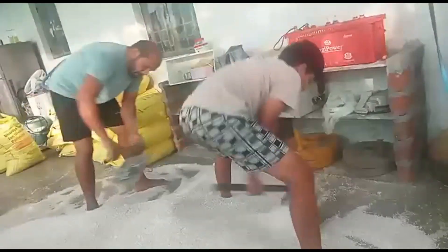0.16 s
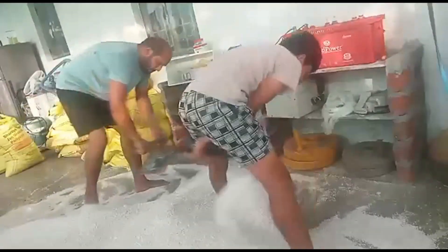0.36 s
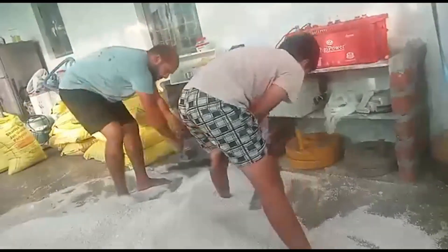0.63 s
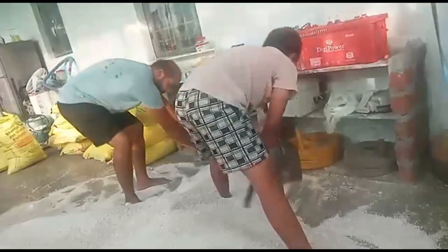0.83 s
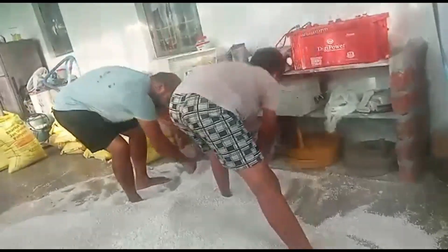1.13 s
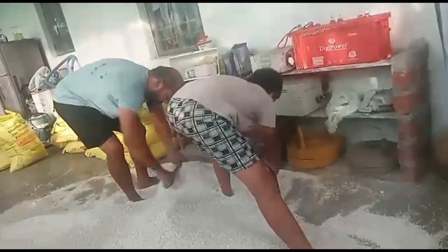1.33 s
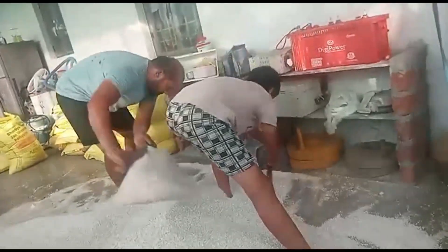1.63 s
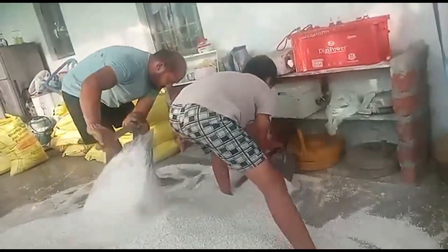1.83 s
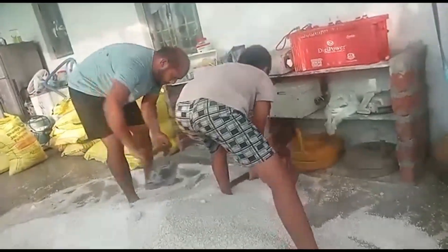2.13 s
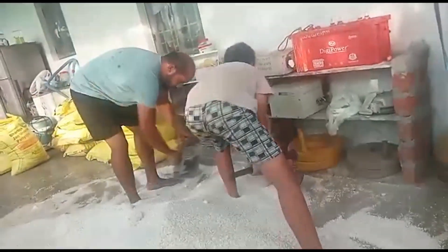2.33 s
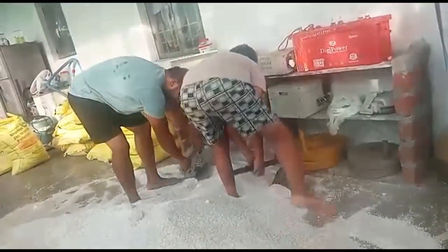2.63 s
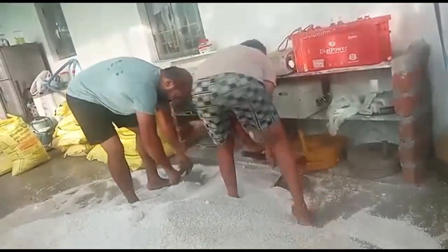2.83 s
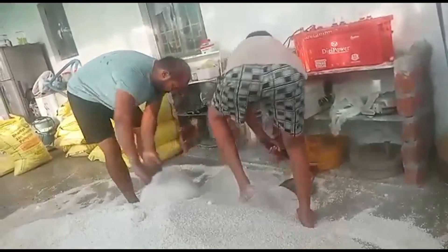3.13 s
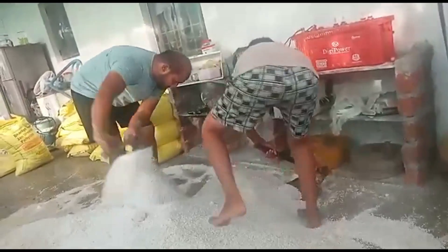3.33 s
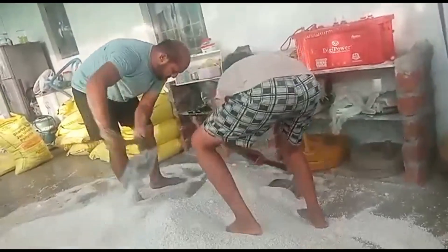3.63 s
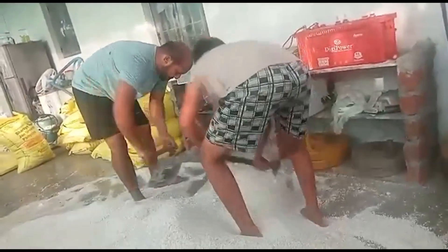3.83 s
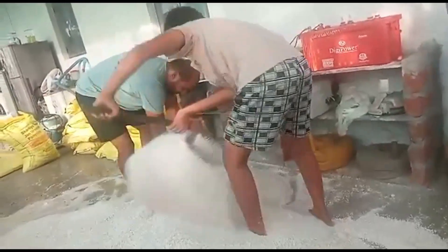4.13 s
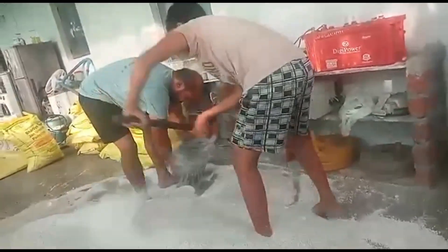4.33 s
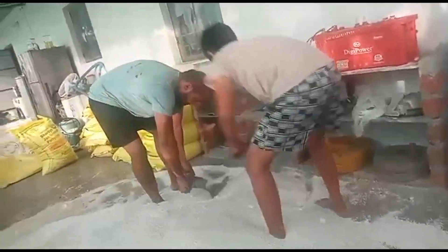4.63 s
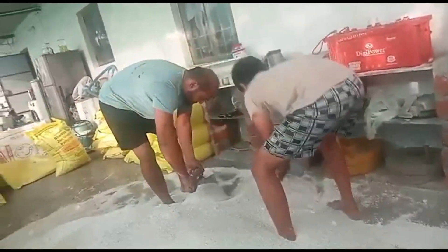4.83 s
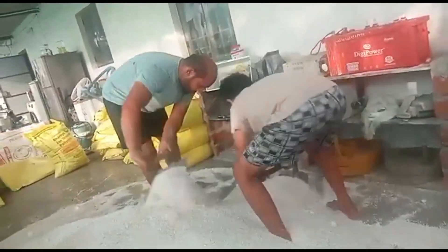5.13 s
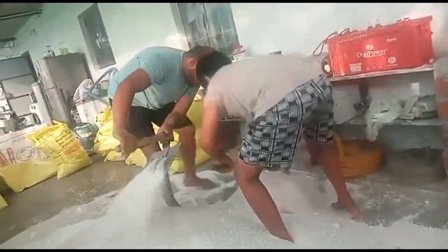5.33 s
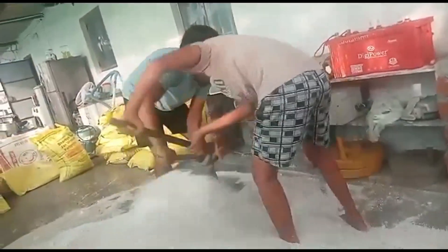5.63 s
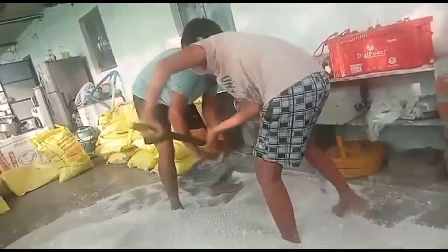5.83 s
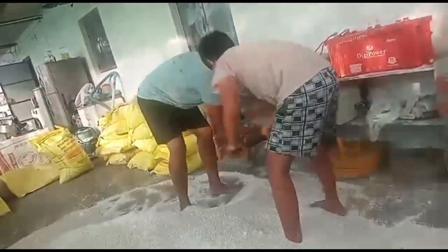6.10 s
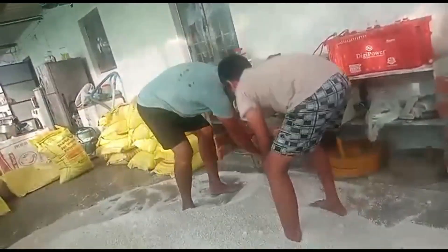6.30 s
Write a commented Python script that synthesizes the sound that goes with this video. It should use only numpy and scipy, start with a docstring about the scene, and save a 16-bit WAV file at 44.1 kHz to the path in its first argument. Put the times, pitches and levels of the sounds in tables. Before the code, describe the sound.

In a hard-walled store room, two steel shovels work dry granular fertilizer on concrete, heard close in mono over faint room tone. A soft scrape fades by 0.2 s while granules trickle. At 0.65-1.0 s comes the loudest passage: a rapid run of bright, crunchy clanks with ringing scrape and low blade thumps. It drops to quiet trickling; faint gliding bird chirps sound at 1.25-1.7 s. From 1.85 s a scrape swells into a clank near 1.95, then a heavy ringing hit with a thump at 2.24 and another at 2.35, trailing into lighter scrapes until 3.05. A duller clatter and scrape follows at 3.5-3.65, a short sharp clank at 4.03, a scrape at 4.4-4.7, faint chirps near 5.0, and a gritty push at 5.13-5.45. A bright crunching strike at 5.85 leads to scraping, thumps and high thin clinks, strongest around 6.26-6.3, ending in faint hiss.

```python
"""Two shovels in granular fertilizer

In a store room, two steel hand shovels work a heap of fertilizer on a concrete floor.
The blades scrape and strike the floor: noise bursts for grit, damped modes for the ringing steel,
low modes for the loaded blade. Thrown or trickling granules hiss as dense, lumpy noise.
A loose steel fitting clinks in decaying sines; a bird outside chirps in short gliding whistles.
One phone microphone takes it all in, with room tone and an answer from the walls."""
import sys
import numpy as np
from scipy import signal
from scipy.fft import rfft, irfft, next_fast_len
from scipy.io import wavfile
from scipy.ndimage import uniform_filter1d, map_coordinates

SR = 44100
rng = np.random.default_rng(int(sys.argv[2]) if len(sys.argv) > 2 else 0)


def generate_wav(sig):
    """Save sig (samples, or channels by samples) to the path in sys.argv[1] as 16-bit PCM at SR."""
    pcm = np.round(np.clip(np.atleast_2d(sig).T, -1, 1) * 32767).astype(np.int16)
    wavfile.write(sys.argv[1], SR, pcm)


N = 284886
T = np.arange(N) / SR  # s
T_HIT = T[:SR // 2]  # the half second given to each blow, push or clink


def amp(db):
    """Gain of a level in dB."""
    return 10 ** (np.asarray(db) / 20)


def unit(x):
    """The signal scaled to rms 1."""
    return x / np.sqrt(np.mean(x ** 2) + 1e-20)


def along(points, hz):
    """Values between (Hz, value) points, read on a log frequency axis."""
    f, v = np.transpose(points)
    return np.interp(np.log(hz + 1), np.log(f + 1), v)


def wobble(rate):
    """A smooth random curve over the whole scene, with rate knots a second."""
    return map_coordinates(rng.standard_normal(int(N * rate / SR) + 4), [T * rate])


def jitter(rate):
    """A smooth random curve half a second long, with rate knots a second."""
    return map_coordinates(rng.standard_normal(int(rate) + 4), [T_HIT * rate])


def filtered(x, response):
    """The signal passed through a complex response of frequency."""
    m = next_fast_len(len(x) + 8192)
    spectrum = rfft(x, m) * response(np.fft.rfftfreq(m, 1 / SR))
    return irfft(spectrum, m)[:len(x)]


def mode(f, hz, width):
    """Response of one damped resonance: the wider it is, the sooner it dies."""
    return 1j * f * width / (hz * hz - f * f + 1j * f * width)


def grains(spectrum, spiky_db, lumpy_db, streaky_db):
    """Dense tiny impacts of uneven size that come in lumps; countless weak modes streak them."""
    lumps_db = lumpy_db * (wobble(70) + 0.57 * wobble(25))
    sizes = amp(spiky_db * rng.standard_normal(N) + lumps_db)
    z = signal.stft(sizes * rng.standard_normal(N), nperseg=1024)[2]
    streaks = uniform_filter1d(rng.standard_normal(z.shape), size=4, axis=1)
    impacts = signal.istft(z * amp(streaky_db * unit(streaks)), nperseg=1024)[1][:N]
    return unit(filtered(impacts, lambda f: amp(along(spectrum, f))))


def ringing(modes, drift_db, lumpy_db):
    """Jolts of friction drive all modes; the contact wanders, so each one also swells on its own."""
    jolts = amp(lumpy_db * wobble(50))
    ring = np.zeros(N)
    for hz, width, db in modes:
        swell = amp(db + drift_db * np.tanh(wobble(20)))
        drive = jolts * swell * rng.standard_normal(N)
        # the resonance acts twice, so each is widened; the root keeps wide modes from gaining power
        ring += filtered(drive, lambda f: mode(f, hz, 1.64 * width) ** 2 / np.sqrt(width))
    ring = unit(ring)
    # the stroke's power is shared: when one mode swells the others give way
    nearby_power = np.abs(uniform_filter1d(ring ** 2, size=3000))
    return unit(ring / (nearby_power + .1) ** 0.37)


def favoured(modes, hz, db_per_octave, wander):
    """Unsteady swings: the load detunes the modes until the nearest lies at hz; neighbours are fainter."""
    pitch = np.array([m[0] for m in modes], float)
    nearest = np.argmin(abs(np.log(pitch / hz)))
    pitch = pitch * hz / pitch[nearest]
    db = -db_per_octave * abs(np.log2(pitch / hz))
    loudest = np.argsort(-db)[:3]
    return sum(amp(db[k]) * np.sin(2 * np.pi * pitch[k] * T_HIT + wander()) for k in loudest)


# tone of the store room at the microphone: pitch_hz, density_db (per Hz, relative)
ROOM_TONE = [(25, -26), (40, -13), (57, -0.5), (95, 2), (125, -10), (180, -3), (330, -8.5), (420, -9),
             (700, -15), (1900, -15), (3600, -15), (5700, -38), (10300, -12.5), (15600, -23.5)]
ROOM_TONE_DB = -62  # rms


def room_tone():
    """The steady air of the store room: a bed of nearly even noise."""
    return amp(ROOM_TONE_DB) * grains(ROOM_TONE, spiky_db=1.5, lumpy_db=1.0, streaky_db=1.0)


# how long the store room rings: pitch_hz, t60_s
WALLS = [(200, 0.43), (2000, 0.23), (10000, 0.096)]


def walls(x):
    """Each frequency of the room's answer dies at its own speed."""
    hz, t, z = signal.stft(rng.standard_normal(SR // 2), SR, nperseg=256)
    decay = amp(-60 * t / along(WALLS, hz)[:, None])
    tail = signal.istft(z * decay, SR, nperseg=256)[1]
    late = np.pad(x, (300, 0))  # samples of delay before the answer
    return signal.fftconvolve(late, tail / np.linalg.norm(tail))[:N]


# chirps from outside: start_s, length_s, start_pitch_hz, end_pitch_hz, level_db
CHIRPS = [(1.262, .05, 3400, 3730, -58), (1.287, 0.054, 4250, 4350, -57), (1.301, 0.073, 3230, 3080, -61),
          (1.465, .07, 3150, 3400, -54), (1.511, 0.065, 2900, 3030, -51), (1.565, .04, 3400, 3700, -60),
          (1.608, 0.04, 3430, 3400, -52), (1.622, 0.055, 3200, 3150, -53), (4.97, 0.06, 3610, 3530, -59),
          (5.0, 0.038, 4550, 4560, -62)]


def bird():
    """Short gliding whistles, made slightly rough by a fast random pitch."""
    out = np.zeros(N)
    for start, length, hz0, hz1, db in CHIRPS:
        n = round(length * SR)
        pitch = np.linspace(hz0, hz1, n) + 110 * wobble(162)[:n]
        whistle = np.sin(2 * np.pi * np.cumsum(pitch) / SR)
        out[round(start * SR):][:n] += amp(db) * np.sqrt(np.hanning(n)) * whistle
    return out


# light contacts of the loose fitting: start_s, level_db, low_modes_db (added below 7 kHz)
CLINKS = [(5.95, -51, -20), (6.12, -48.5, -15), (6.261, -37.5, -12), (6.283, -39, 0), (6.305, -46.5, 1),
          (6.394, -43, -10)]
# modes of the fitting: pitch_hz, level_db, t60_s
FITTING = [(2196, -16.5, .8), (2821, -5, 0.14), (4502, -10, .42), (5630, -13, 0.45), (5900, -19, 0.83),
           (8436, -8, 0.22), (9240, -10, 0.29), (10340, 2.5, 0.24), (11600, -18, .2), (13500, -25, .2)]


def fitting():
    """Light contacts ring a loose steel part; where it is touched sets the share of its low modes."""
    out = np.zeros(N + SR)
    for start, db, low_db in CLINKS:
        ring = np.zeros(len(T_HIT))
        for hz, mode_db, t60 in FITTING:
            touch_db = low_db * (hz < 7000) + rng.uniform(-2.7, 1.3)
            unsteady_db = 1.5 * wobble(34)[:len(T_HIT)]
            level = amp(mode_db + touch_db - 60 * T_HIT / t60 + unsteady_db)
            ring += level * np.sin(2 * np.pi * (hz * T_HIT + rng.random()))
        onset = 1 - np.exp(-T_HIT / 0.0075)
        out[round(start * SR):][:len(T_HIT)] += amp(db) * ring * onset
    return out[:N]


# soft pushes on the loaded blade: start_s, level_db, pitch_hz (loudest ring)
THUMPS = [(.05, -52, 450), (.13, -52, 460), (0.66, -32, 167), (.658, -37, 470), (.708, -40, 470),
          (.715, -40, 180), (.745, -35, 449), (.79, -38, 480), (.845, -43, 460), (.88, -43, 450),
          (1.55, -52, 823), (1.959, -48, 203), (2.11, -50, 340), (2.236, -27, 489), (2.24, -32, 272),
          (2.27, -34, 520), (2.25, -39, 149), (2.25, -38, 900), (2.45, -46, 150), (2.36, -40, 142),
          (2.58, -44, 180), (2.685, -43, 453), (2.99, -44, 449), (3.04, -46, 520), (3.5, -33, 449),
          (3.5, -38, 820), (3.505, -47, 171), (3.63, -42, 450), (3.525, -35.5, 474), (4.44, -46, 960),
          (4.5, -45, 960), (5.09, -54, 1050), (5.14, -48, 1006), (5.24, -40.5, 441), (5.3, -45, 820),
          (5.852, -33, 180), (5.924, -35, 356), (5.925, -42, 830), (5.955, -33, 819), (5.99, -35, 810),
          (5.96, -36, 241), (6.04, -46, 450), (6.13, -46, 480), (6.238, -42, 270), (6.3, -48, 350)]
# low modes of a loaded blade: pitch_hz, width_hz, level_db
BELLY = [(146, 28, -16), (177.8, 83, -5), (256, 140, -16), (359.5, 63, -5), (450.8, 64, 3.5), (537, 136, 0),
         (812, 53, -3), (951, 78, -2.5)]
THUMP_T60_S, THUMP_FAVOUR_DB_PER_OCTAVE = .25, 35


def thumps():
    """A soft push sets the low modes swinging, unsteady in phase and strength."""
    out = np.zeros(N + SR)
    for start, db, hz in THUMPS:
        swing = favoured(BELLY, hz, THUMP_FAVOUR_DB_PER_OCTAVE, lambda: 1.09 * jitter(60.6))
        strength = amp(2.8 * np.tanh(jitter(43)))
        shape = amp(db - 60 * T_HIT / THUMP_T60_S) * (1 - np.exp(-T_HIT / 0.006))
        out[round(start * SR):][:len(T_HIT)] += shape * strength * swing
    return out[:N]


# blows of a blade: start_s, level_db, t60_s (of the crunch), brightness_db (per octave, of the crack),
# pitch_hz (loudest ring), shovel (0 first, 1 second)
BLOWS = [(0.291, -31, .07, -2, 2163, 1), (0.656, -6, .09, 5, 3580, 0), (0.707, -7.5, .08, -.4, 1830, 0),
         (0.794, -17.5, .12, 8, 950, 0), (.8, -20, .12, -3, 1700, 0), (0.859, -7, .15, 3, 2300, 0),
         (0.889, -6, .1, 4, 2980, 0), (0.938, -6, .11, 3.5, 3840, 0), (0.964, -6, .12, 2.5, 3140, 0),
         (1.39, -41, .07, -3, 1030, 0), (1.544, -34, .12, -3, 869, 0), (1.85, -20.5, .13, -8, 1320, 1),
         (1.956, -12, .12, -8, 2020, 1), (2.238, -9, .1, -3, 2470, 0), (2.245, -17, .12, -8, 1150, 0),
         (2.346, -11, .06, -6, 2485, 0), (2.489, -24.5, .14, 3, 2330, 0), (2.579, -21, .15, -7, 1640, 0),
         (2.818, -29, .09, 3, 2210, 0), (2.884, -29, .09, -4.5, 2970, 0), (2.944, -24, .09, 0.7, 3500, 0),
         (2.994, -27, .09, .3, 2750, 0), (3.215, -42, .05, .3, 2900, 0), (3.4, -43, .06, .3, 2500, 0),
         (3.497, -13, .13, -5, 1750, 0), (3.524, -17, .11, -3, 1740, 0), (3.555, -19, .12, -5, 1370, 0),
         (3.618, -19, .12, -4, 1780, 0), (3.901, -30, .09, .3, 2200, 0), (3.998, -27, .06, .3, 2760, 0),
         (4.016, -24, .07, 2.5, 3540, 0), (4.026, -11, .055, -4, 3540, 0), (4.075, -18, .06, -4, 3630, 0),
         (4.12, -27, .07, 2.5, 2280, 0), (4.372, -24, .1, .3, 2880, 1), (4.397, -17, .09, -1, 3650, 1),
         (5.127, -22, .09, .3, 3490, 1), (5.231, -17, .14, -5, 1310, 1), (5.25, -20, .15, -3, 2300, 1),
         (5.781, -22, .15, 2, 3420, 0), (5.849, -9, .085, 3, 3280, 0), (5.946, -27, .08, 3, 3780, 0)]
# blade modes of the first and of the second shovel: pitch_hz, width_hz, level_db
FIRST = [(921, 25, -11), (1155, 22, -5), (1320.5, 28, -8), (1740, 32, -1), (2290, 32, 0.3),
         (2764, 21, -6.5), (3064, 156, 3.5), (3620, 870, 4.5), (3950, 25, -3), (4900, 40, -3),
         (5600, 58, -2.5), (6440, 45, -8.5), (7010, 130, -5), (7630, 38, -38), (7300, 68, -27),
         (8540, 130, -7.5), (9400, 150, -27.5), (10230, 20, -28.5), (10900, 12, -29)]
SECOND = [(981.5, 28, 0.5), (1324, 63, 5), (2050, 330, -19), (2134, 170, 4), (2866, 20, 3),
          (3530, 150, 6.5), (3930, 87, 4.5), (4350, 47, 2.5), (5250, 43, 1.5), (6030, 76, -3),
          (5960, 190, -10), (6780, 65, 0.5), (8370, 71, -5), (9690, 230, 1.5)]
# grit scraped along the floor: pitch_hz, density_db (per Hz, relative)
GRIT = [(410, -36), (700, -11.5), (2130, 1), (2290, 3), (2660, 1.5), (3030, -0.5), (3300, 0), (3910, -3.5),
        (9000, -18), (11700, -36), (19800, -120)]
# granules landing: pitch_hz, density_db (per Hz, relative)
HISS = [(2650, -46), (4500, -3.5), (4810, -12.5), (5230, -10.5), (7800, -9.5), (9110, -6.5), (10100, -4),
        (13400, -20.5), (15600, -28)]
RING_OVER_CRUNCH, BLOW_FAVOUR_DB_PER_OCTAVE = 1.5, 30  # the clear ring's t60 is 1.5 times the crunch's


def blows():
    """Each blow is a crunch of crushed granules that rings the blade anew."""
    out = np.zeros(N + SR)
    for start, db, t60, tilt_db, pitch_hz, shovel in BLOWS:
        modes = SECOND if shovel > .5 else FIRST
        clear = favoured(modes, pitch_hz, BLOW_FAVOUR_DB_PER_OCTAVE, lambda: 0.9 * jitter(92))
        clear *= amp(-60 * T_HIT / (RING_OVER_CRUNCH * t60)) * (1 - np.exp(-T_HIT / 0.0025))

        def steel(f):
            """All modes of the blade, struck a little differently each time."""
            return sum(amp(mode_db + 2.3 * rng.normal()) * mode(f, hz, width) for hz, width, mode_db in modes)

        def granules(f):
            """Grit and the top of the hiss, tilted by the brightness of the blow."""
            return amp(along(GRIT[:-2] + HISS[-3:], f) + tilt_db * np.log2(f / 3000 + .15))

        shape = amp(-60 * T_HIT / t60) * (1 - np.exp(-T_HIT / 0.0019))
        crunch = shape * rng.standard_normal((2, len(T_HIT)))
        ring = filtered(crunch[0], steel)
        crack = filtered(crunch[1], granules)
        blow = .1 * clear + 0.21 * ring / np.abs(ring).max() + 0.1 * crack / np.abs(crack).max()
        out[round(start * SR):][:len(T_HIT)] += amp(db) * blow
    return out[:N]


# a stroke bites, swells or sags to a second level, moves to a third, and fades from lift_s:
# bite_s, bite_db, second_s, second_db, lift_s, third_db, release_db (per s), belly_db and hiss_db
# (re scrape), ring_share (0-1), second_shovel_share (0-1, of the ringing)
STROKES = [(0, -42, .02, -38, .17, -53, 150, -13.5, -6, .3, .7),
           (.658, -31.5, .70, -35, .79, -33, 200, -12, -10.5, 0.47, 0),
           (.79, -35, .93, -29, 1.08, -39, 170, -28, -2.5, 0.44, 0.01),
           (1.26, -63, 1.29, -60, 1.332, -64, 140, -25, -10, .25, .05),
           (1.545, -55, 1.52, -56, 1.71, -65, 140, -5, -9, .4, 0.1),
           (1.85, -38, 1.97, -29.5, 2.21, -49, 200, -16.5, -8.5, 0.5, 0.55),
           (2.237, -26.5, 2.26, -29.5, 2.316, -43, 140, -7, -8.5, 0.43, .2),
           (2.345, -37, 2.352, -37, 2.45, -48, 140, -5.5, -7.5, .6, 0.21),
           (2.49, -44, 2.62, -41, 3.05, -48, 330, -10, -6, 0.48, 0.24),
           (3.499, -30.5, 3.55, -34.5, 3.67, -33.5, 115, -15.5, -5, 0.66, .1),
           (3.9, -46, 3.84, -45.5, 3.94, -53, 140, -18, -9, .4, 0.1),
           (4.005, -54, 4.04, -47, 4.14, -60, 140, -30, -7, .3, 0.1),
           (4.36, -49, 4.53, -32.5, 4.695, -53, 200, -22, -9, 0.32, 0.58),
           (5.127, -43.5, 5.135, -44, 5.19, -47, 140, -13.5, -3.5, 0.55, 0.8),
           (5.19, -45, 5.26, -37, 5.45, -40, 200, -15.5, -2.5, .3, .8),
           (5.78, -47.5, 5.79, -45.5, 5.82, -45.5, 300, -17.5, 4.5, .2, .3),
           (5.849, -29.5, 5.83, -29, 5.91, -49, 140, -15.5, -1.5, 0.12, 0.4),
           (5.944, -37, 5.9, -32, 6.24, -55.5, 140, -7, -3.5, .4, 0.43),
           (6.245, -61, 6.29, -53.5, 6.36, -64, 140, -5.5, -3, 0.8, .5),
           (6.4, -63, 6.6, -57.5, 6.3, -58, 140, -13, -1, 0.5, .6)]
# points of one continuous curve of running granules, with levels gliding between them:
# time_s, hiss_db, grit_db (re hiss)
TRICKLE = [(0, -59, -4), (.35, -59, -6), (.62, -59, -0.5), (1.23, -65, -4), (1.5, -57.5, -9),
           (1.62, -57.5, -7), (1.67, -66, -1.5), (1.76, -71, 2), (1.84, -51.5, -1.5), (3.0, -60, -5),
           (3.1, -68, -3), (3.45, -65, -2), (3.49, -56, 0), (3.9, -54.5, -0.5), (4.33, -57.5, -3),
           (4.8, -62.5, 2.5), (4.95, -61.5, -7), (5.08, -55, -8), (5.66, -67.5, -3.5), (5.77, -60.5, 1.5),
           (6.46, -60, -9)]
BITE_DB_PER_S = 1800


def strokes():
    """Scrape of grit, ringing blades, low belly of the load and granule hiss; strokes add in power."""
    time, trickle_db, grit_db = np.transpose(TRICKLE)
    power = np.zeros((5, N))  # grit, first blade, second blade, belly, hiss
    power[0] = amp(2 * np.interp(T, time, trickle_db + grit_db))
    power[4] = amp(2 * np.interp(T, time, trickle_db))
    for bite, bite_db, second_s, second_db, lift, third_db, release, belly_db, hiss_db, share, turn in STROKES:
        times = [bite, max(second_s, bite), max(lift, second_s, bite)]  # kept in order
        db = np.interp(T, times, [bite_db, second_db, third_db])
        db -= BITE_DB_PER_S * np.maximum(bite - T, 0)
        db -= release * np.maximum(T - lift, 0)
        share, turn = np.clip([share, turn], 0, 1)
        parts = [1 - share, share * (1 - turn), share * turn, amp(2 * belly_db), amp(2 * hiss_db)]
        power += np.outer(parts, amp(2 * db))
    first = ringing(FIRST, drift_db=6, lumpy_db=2)
    second = ringing(SECOND, drift_db=6, lumpy_db=2)
    grit = grains(GRIT, spiky_db=4.5, lumpy_db=0.9, streaky_db=4.5)
    belly = ringing(BELLY, drift_db=0.5, lumpy_db=3.0)
    hiss = grains(HISS, spiky_db=4, lumpy_db=1.1, streaky_db=4.5)
    return np.sum(np.sqrt(power) * [grit, first, second, belly, hiss], axis=0)


def scene():
    """Everything reaches a single microphone; the walls answer the sharp blows and the far bird."""
    echoed = bird() + blows()
    background = room_tone() + amp(-7.5) * walls(echoed)
    mono = background + echoed + fitting() + thumps() + strokes()
    return np.array([mono, mono])


TOP_HZ = 15700


def record(dry):
    """The phone microphone keeps nothing above its band limit."""
    return np.array([filtered(channel, lambda f: f < TOP_HZ) for channel in dry])


dry = scene()
out = record(dry)
generate_wav(out)
```